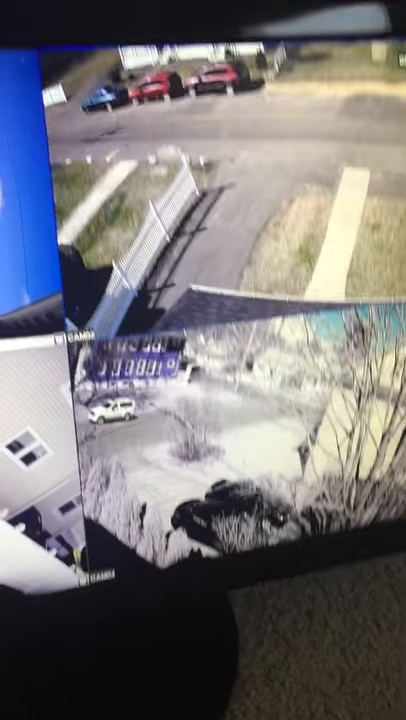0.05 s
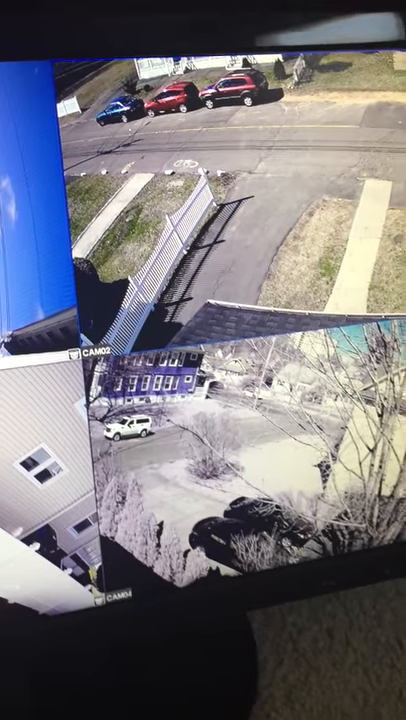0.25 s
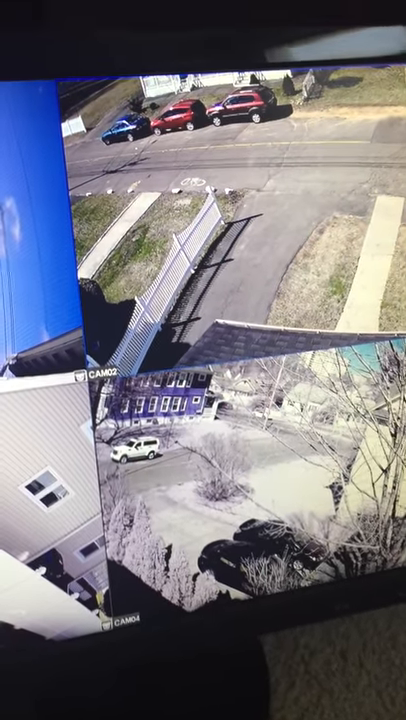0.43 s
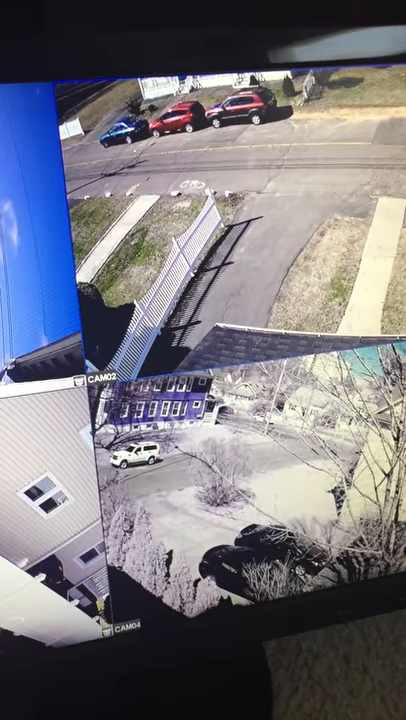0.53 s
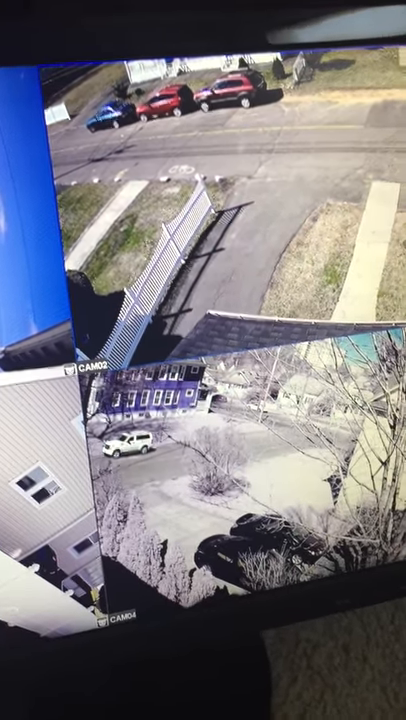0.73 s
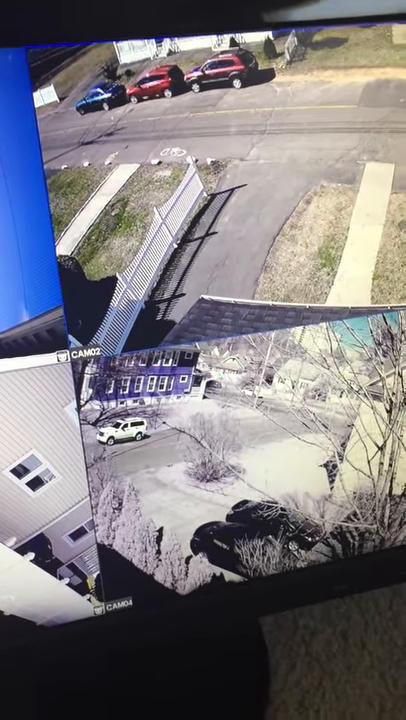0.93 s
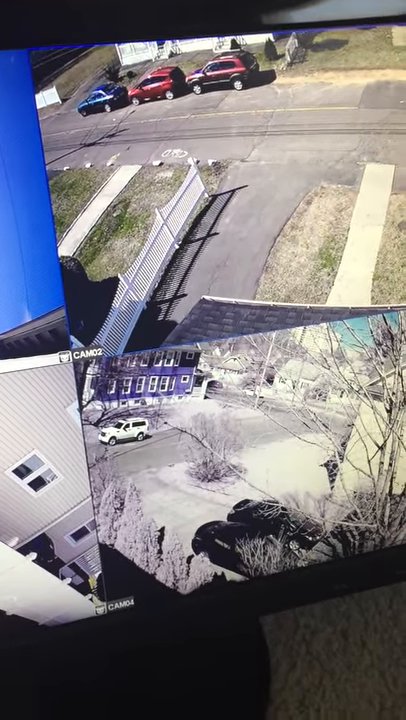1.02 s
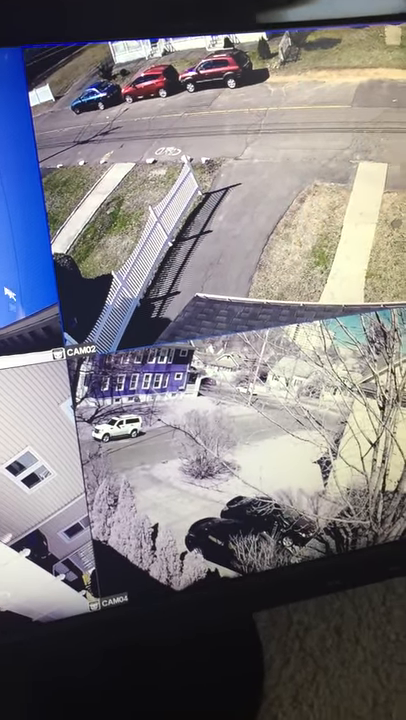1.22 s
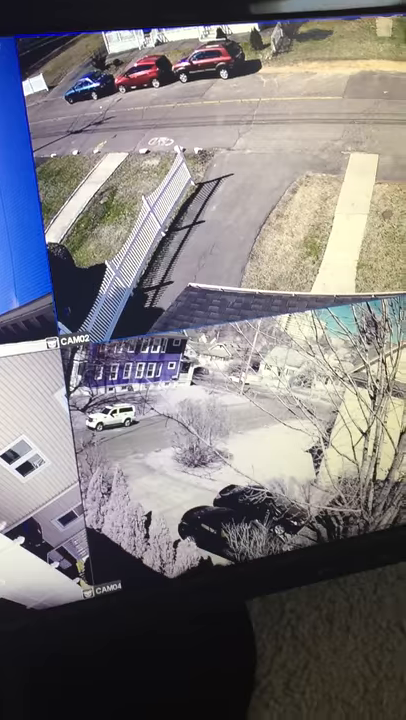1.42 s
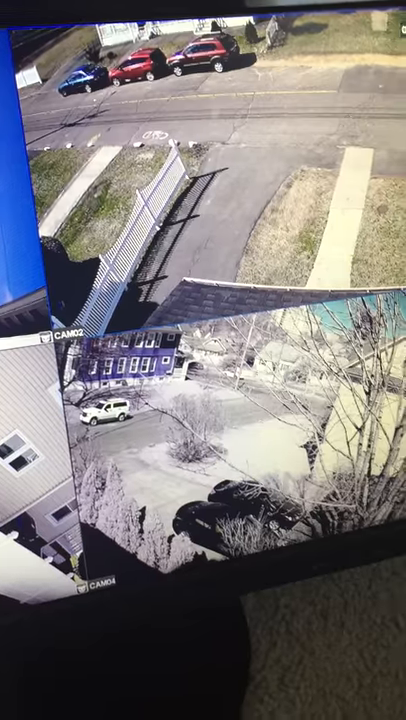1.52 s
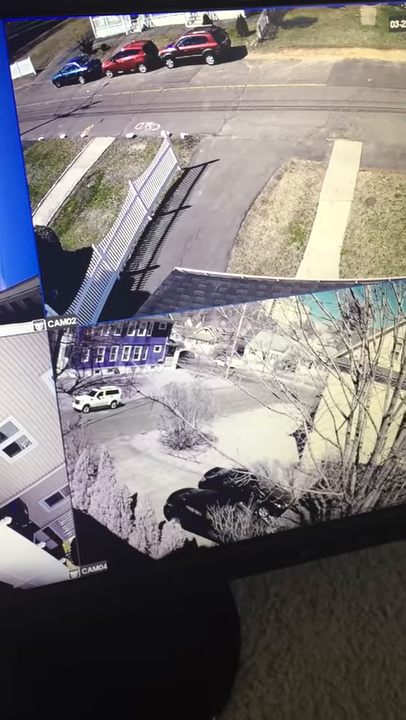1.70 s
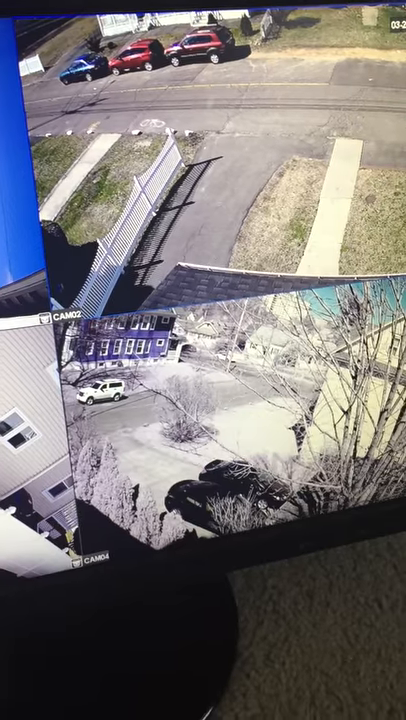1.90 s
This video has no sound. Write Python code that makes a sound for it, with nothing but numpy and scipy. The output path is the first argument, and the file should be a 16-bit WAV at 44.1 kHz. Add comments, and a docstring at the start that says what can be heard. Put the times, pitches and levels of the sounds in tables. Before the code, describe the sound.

A computer mouse slides across a desk in soft, grainy, uneven strokes; after a brief gap it is set down with a hollow plastic knock and slides on. Small quiet room, close microphone, faint hiss.

```python
"""Steady room tone and hiss open the scene; a plastic computer mouse then slides over a desk in uneven strokes.
Its feet catch on the grain: dense tiny impacts excite the modes of desk top and hollow shell, with direct hiss.
Small catches sound as short noisy blows; in the second span of movement the mouse is set down with a knock
and bounces, and a dull low swell of the desk follows. Sparse reflections of a small room trail the mouse."""
import sys
import numpy as np
from scipy import signal
from scipy.fft import rfft, irfft
from scipy.io import wavfile
from scipy.ndimage import uniform_filter1d

SR = 44100
rng = np.random.default_rng(int(sys.argv[2]) if len(sys.argv) > 2 else 0)


def ratio(d):
    """dB to gain"""
    e = np.asarray(d, float) / 20
    return 10 ** e


def materialize(psi):
    """Save the field psi as 16-bit PCM at rate SR to the path in sys.argv[1].

    A 1-D psi becomes a single channel; in a 2-D psi each row is a channel.
    """
    bounded = np.clip(np.atleast_2d(psi).T, -1, 1)
    quanta = np.round(bounded * 32767).astype(np.int16)
    wavfile.write(sys.argv[1], SR, quanta)


N = 85995  # length in samples


def evened(x):
    """Normalisation: scales a signal to unit rms."""
    return x / np.sqrt(np.mean(x ** 2) + 1e-20)


def coloured(x, spectrum):
    """Linear filtering: weights the spectrum of x by levels interpolated over log frequency."""
    hz, level_db = np.transpose(spectrum)
    bins_hz = np.fft.rfftfreq(N, 1 / SR)
    weight_db = np.interp(np.log(bins_hz + 1), np.log(hz + 1), level_db)
    return irfft(rfft(x) * ratio(weight_db), N)


# Spectrum of the background, relative: f/Hz, level per Hz/dB
AIR_SPECTRUM = [(22, -21), (50, 6), (85, -4.5), (188, 4.5), (240, -3), (282, -2.5), (687, -9),
                (1720, -14.5), (2250, -13.5), (3100, -14.5), (4910, -19), (5770, -18.5), (15600, -27)]
AIR_DB = -70.5  # rms of the whole background, dB re full scale


def air():
    """Stationary noise: room tone and microphone hiss, as shaped Gaussian noise."""
    return ratio(AIR_DB) * evened(coloured(rng.standard_normal(N), AIR_SPECTRUM))


# Course of the sliding, one list a span of movement; the last begins abruptly, straight after the third:
# t/s, shell level/dB, desk level/dB, brightness level at BRIGHT_HZ/dB, hiss level before colouring/dB
MOVEMENT_CURVES = [
    [(0.208, -68, -51.5, -12, -96), (0.214, -59, -52.5, -13, -94), (0.245, -43.5, -51, -9, -80),
     (0.279, -52, -47, -10, -90), (0.299, -52.5, -55.5, -14, -88), (0.319, -45.5, -42.5, -30, -80),
     (0.329, -52.5, -49.5, -5.5, -81.5), (0.399, -48, -56, -8.5, -74), (0.427, -52, -56, -12.5, -78),
     (0.457, -59, -52.5, -14, -84), (0.511, -52.5, -59, -15.5, -80), (0.553, -52, -42.5, -26, -85),
     (0.563, -69, -58, -29, -94), (0.607, -98, -82, -17, -102), (0.65, -67, -79, -2, -100)],
    [(0.691, -38, -50, -5.5, -60), (0.718, -43.5, -43.5, -12, -67), (0.755, -43.5, -47, -12, -86),
     (0.789, -58, -54.5, -10.5, -89), (0.847, -50, -54, -12, -78.5), (0.881, -46, -45.5, -18, -82),
     (0.919, -49, -47.5, -26, -87), (0.943, -52.5, -49.5, -17, -86), (0.985, -61, -63, -13.5, -88),
     (1.055, -49.5, -51, -25.5, -88), (1.063, -57.5, -57, -8, -89), (1.079, -56.5, -57.5, -27, -93),
     (1.135, -57.5, -53.5, -49, -92), (1.183, -69, -78, -52, -101), (1.23, -102, -81, -9, -98.5)],
    [(1.265, -71, -56, -11, -95), (1.281, -56.5, -64, -17, -97), (1.302, -60.5, -54.5, -31, -96),
     (1.365, -57, -84, -26, -101)],
    [(1.372, -51, -60, -13.5, -90), (1.41, -46, -52.5, -20, -84), (1.47, -45, -52, -10.5, -81),
     (1.522, -42, -53, -12.5, -68.5), (1.536, -45, -56.5, -14.5, -72), (1.556, -45.5, -47, -5.5, -72.5),
     (1.642, -50, -52.5, -10.5, -78), (1.668, -57, -60, -7, -91), (1.68, -52, -56.5, -27, -100),
     (1.72, -63, -54, -18, -101), (1.74, -57, -60, -28, -102), (1.812, -57, -65.5, -29, -103),
     (1.834, -69, -71, -5, -79), (1.866, -60, -58.5, -16, -82), (1.906, -74, -68, -50, -101),
     (1.95, -68, -53, -16, -92)],
]


def movement_controls():
    """Amplitude modulation: the level curves at every sample, and a gate open while the mouse moves."""
    t = np.arange(N) / SR
    point_s, *curves = np.transpose(np.concatenate(MOVEMENT_CURVES))
    moving = sum((t >= rows[0][0]) & (t <= rows[-1][0]) for rows in MOVEMENT_CURVES)
    gate = uniform_filter1d(moving * 1., size=44)  # edges of 1 ms
    return gate, [np.interp(t, point_s, curve) for curve in curves]


GRIT_PER_S, GRIT_SPREAD_DB = 8000, 2.5  # impact rate; scale of the exponential spread of sizes in dB
CLUMP_DB, CLUMP_S = 1.5, .008  # rms depth in dB and averaging time in s of the clumps


def grit():
    """Random impulse process: tiny impacts of random sign come in clumps, a few of them larger."""
    spread_db = GRIT_SPREAD_DB * np.minimum(rng.exponential(1, N), 5)
    size = ratio(spread_db) * rng.standard_normal(N)
    slow = uniform_filter1d(rng.standard_normal(N), int(CLUMP_S * SR))
    clumps = ratio(CLUMP_DB * evened(slow))
    impact = rng.random(N) < GRIT_PER_S / SR
    return evened(size * clumps * impact)


WANDER_DB, WANDER_S = 2.5, 0.049  # rms depth in dB and averaging time in s of the drift
KEPT_SIGN = .75  # share of impacts that keep their own sign in a mode; the rest are flipped


def coupling():
    """Modal coupling: a mode keeps the sign of most impacts; its drive drifts as the mouse changes place."""
    n = int(WANDER_S * SR)
    slow = uniform_filter1d(uniform_filter1d(rng.standard_normal(N), n), n)
    sign = np.where(rng.random(N) < KEPT_SIGN, 1., -1.)
    return ratio(WANDER_DB * evened(slow)) * sign


def ring(x, hz, width, order=2):
    """Resonance: one mode as repeated complex poles, steep at order 2; unit white noise gives unit rms."""
    r = np.exp(-np.pi * width / SR)
    pole = r * np.exp(2j * np.pi * hz / SR)
    for _ in range(order):
        x = signal.lfilter([1], [1, -pole], x)
    return np.sqrt(2 * (1 - r ** 2) ** (2 * order - 1) / (1 + r ** 2) ** (order - 1)) * x.real


def mode_gains(modes):
    """Modal superposition: gains whose powers sum to 1, neighbours in opposite sense."""
    gain = ratio(np.transpose(modes)[2])
    return gain / np.linalg.norm(gain) * (-1) ** np.arange(len(modes))


PIVOT_HZ, BRIGHT_HZ = 1113, 4510


def bright_share(hz):
    """Spectral tilt: brightness grows by octaves above PIVOT_HZ and counts in full at BRIGHT_HZ."""
    return max(np.log(hz / PIVOT_HZ) / np.log(BRIGHT_HZ / PIVOT_HZ), 0)


def without_lows(x):
    """High-pass filtering: a second-order slope thins the body below 282 Hz."""
    return signal.sosfilt(signal.butter(2, 282, "high", fs=SR, output="sos"), x)


# Direct hiss of the feet, spectral weight: f/Hz, level/dB
SCRAPE_SPECTRUM = [(2500, -32), (5000, 10.5), (7500, 6), (9000, 8.5), (10500, 1), (13000, 4.5), (15600, 0),
                   (15900, -24)]


def feet_hiss(noise):
    """Direct radiation: noise from the feet gets a broad spectrum without the modes of the bodies."""
    return coloured(noise, SCRAPE_SPECTRUM)


# Modes of the desk top, levels relative: f/Hz, width/Hz, level/dB
DESK_MODES = [(166.4, 35, -12.5), (199.8, 33, -6.5), (275.3, 53, -9.5), (350.6, 65, 1.5), (435.3, 48, 0.5),
              (483.8, 61, 1.5), (576, 79, -7.5)]
# High desk modes over low ones as the mouse changes place: t/s, level per octave/dB
DESK_TILT = [(.24, -6.5), (0.318, -19), (.42, 1), (.6, 3), (.71, 7), (.75, -10.5), (1.1, -2.5), (1.6, 0),
             (1.9, -7.5)]
TILT_PIVOT_HZ, TILT_FLOOR_HZ = 400, 330  # no tilt at the pivot; modes below the floor tilt as if at it
# Modes of the hollow shell, levels relative: f/Hz, width/Hz, level/dB
SHELL_MODES = [(632, 24, -8), (752.6, 63, 4.5), (857, 74, 3.5), (979, 126, 2), (1039, 111, 3.5),
               (1238.4, 154, 3), (1466, 156, -1.5), (1675, 197, -0.5), (1888, 127, 0.5), (2088, 200, 1.5),
               (2502, 520, 5.5), (2684, 160, 3.5), (3300, 910, 1.5), (3990, 630, 0), (4600, 420, -2.5),
               (5210, 300, 0), (5760, 1240, -3), (7000, 1450, -3)]


def sliding():
    """Forced vibration: grit under the moving feet drives the modes of desk and shell; the feet hiss."""
    gate, (shell_db, desk_db, bright_db, hiss_db) = movement_controls()
    rub = grit() * gate
    tilt_db = np.interp(np.arange(N) / SR, *np.transpose(DESK_TILT))
    body = np.zeros(N)
    for (hz, width, _), gain in zip(DESK_MODES, mode_gains(DESK_MODES)):
        octaves = np.log2(max(hz, TILT_FLOOR_HZ) / TILT_PIVOT_HZ)
        drive = rub * coupling() * ratio(desk_db + tilt_db * octaves)
        body += gain * ring(drive, hz, width)
    for (hz, width, _), gain in zip(SHELL_MODES, mode_gains(SHELL_MODES)):
        drive = rub * coupling() * ratio(shell_db + bright_share(hz) * bright_db)
        body += gain * ring(drive, hz, width)
    noise = rng.standard_normal(N) * gate * ratio(hiss_db)
    return without_lows(body) + feet_hiss(noise)


ROOM_T60_S, ROOM_DB = .18, -8  # decay time; level of the reflections in dB re the mouse


def room(x):
    """Reverberation: convolution with sparse reflections of random sign under an exponential decay."""
    taps = np.zeros(SR // 2)
    at = np.arange(200, SR // 2 - 20, 20)
    at = at + rng.integers(0, 20, len(at))
    taps[at] = rng.choice([-1., 1.], len(at)) * ratio(-60 * at / SR / ROOM_T60_S)
    return ratio(ROOM_DB) * signal.fftconvolve(x, taps / np.linalg.norm(taps))[:N]


# The set-down, its bounces and small catches:
# t/s, shell level/dB, desk level/dB, brightness level at BRIGHT_HZ/dB, hiss level before colouring/dB
KNOCK_LEVELS = [(0.463, -64, -66, -17, -87), (0.538, -45.5, -49.5, -35, -90), (.690, -31, -35.5, -6, -55),
                (.692, -41.5, -39.5, -25, -73), (.704, -29.5, -43, -37, -83), (.711, -29, -49.5, -33, -78),
                (0.742, -55, -39.5, -15, -85), (.766, -51, -46, -23, -88), (1.374, -52, -60, -8, -85)]
CONTACT_S = 0.0013  # decay time constant of a blow
RING_SHARE = 0.49  # struck modes ring this share as wide as rubbed ones
HIT_TOP_HZ = 5930  # upper limit of the struck modes


def contact(start_s):
    """Impulsive excitation: one short noisy blow that decays exponentially."""
    t = np.arange(N) / SR
    u = np.maximum(t - start_s, 0) / CONTACT_S
    return (t >= start_s) * np.exp(-u) * (1 + rng.standard_normal(N))


def knocking():
    """Free vibration: blows set the modes of desk and shell ringing, all in one sense; the feet hiss."""
    start_s, shell_db, desk_db, bright_db, hiss_db = np.transpose(KNOCK_LEVELS)
    blows = np.array([contact(s) for s in start_s])
    struck = np.zeros(N)
    desk_drive = ratio(desk_db) @ blows
    for (hz, width, _), gain in zip(DESK_MODES, mode_gains(DESK_MODES)):
        struck += abs(gain) * ring(desk_drive, hz, RING_SHARE * width, order=1)
    for (hz, width, _), gain in zip(SHELL_MODES, mode_gains(SHELL_MODES)):
        shell_drive = ratio(shell_db + bright_share(hz) * bright_db) @ blows
        struck += abs(gain) * ring(shell_drive, hz, RING_SHARE * width, order=1)
    body = signal.sosfilt(signal.butter(4, HIT_TOP_HZ, fs=SR, output="sos"), struck)
    return without_lows(body) + feet_hiss(ratio(hiss_db) @ blows)


# Low shake of the desk: centre t/s, spread t/s, rms level at the centre/dB, lower f/Hz, upper f/Hz
DESK_SHAKE = (.75, .04, -65, 35, 170)


def thud():
    """Band-limited noise: a dull low swell after the knock, under a Gaussian envelope."""
    centre_s, spread_s, level_db, lo_hz, hi_hz = DESK_SHAKE
    band = signal.butter(2, [lo_hz, hi_hz], "band", fs=SR, output="sos")
    low = evened(signal.sosfilt(band, rng.standard_normal(N)))
    envelope = np.exp(-.5 * ((np.arange(N) / SR - centre_s) / spread_s) ** 2)
    return ratio(level_db) * low * envelope


def scene():
    """Superposition: background, mouse, its reflections and the thud add in one channel."""
    background = air()
    mouse = sliding() + knocking()
    return (background + mouse + room(mouse) + thud())[None]


def top_cut(x):
    """Nothing passes above the cut-off."""
    return signal.sosfilt(signal.butter(12, 15770, fs=SR, output="sos"), x)


def record(dry):
    """Signal chain: the finished mix goes through the last stage, defined above."""
    return top_cut(dry)


dry = scene()
out = record(dry)
materialize(out)
```